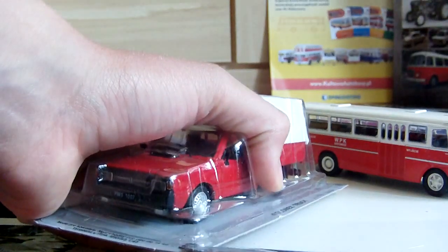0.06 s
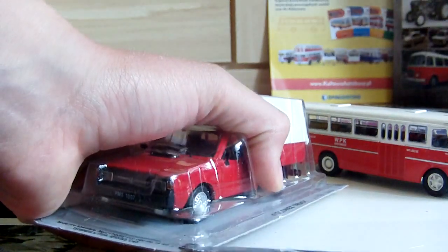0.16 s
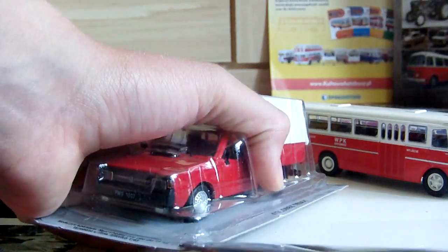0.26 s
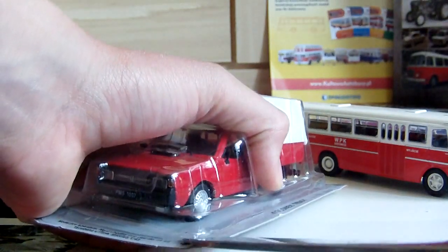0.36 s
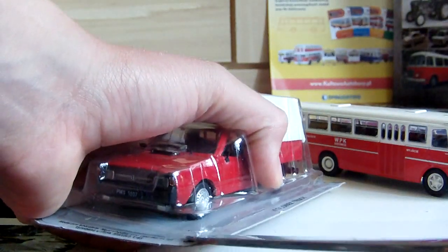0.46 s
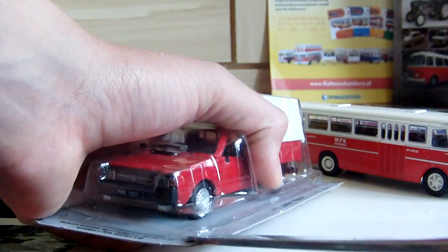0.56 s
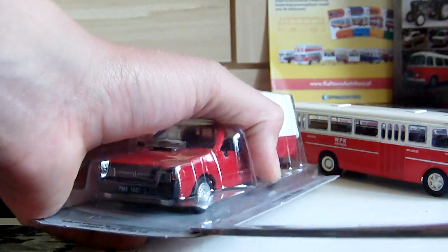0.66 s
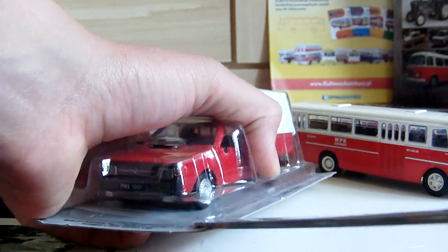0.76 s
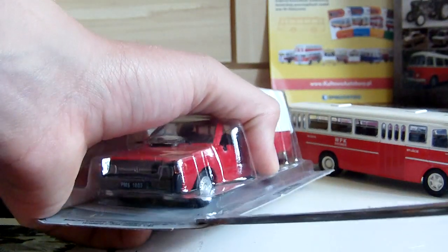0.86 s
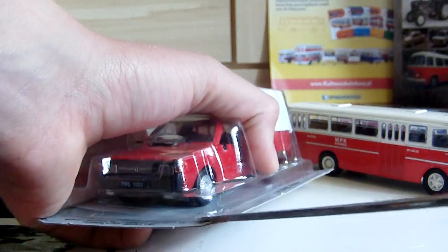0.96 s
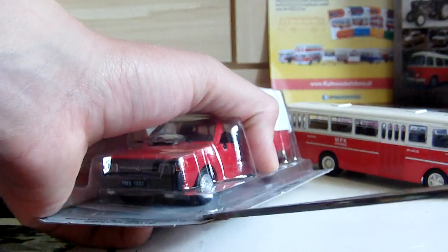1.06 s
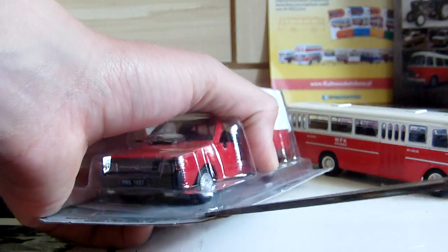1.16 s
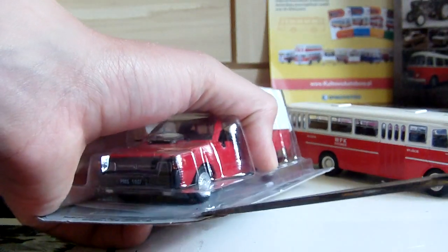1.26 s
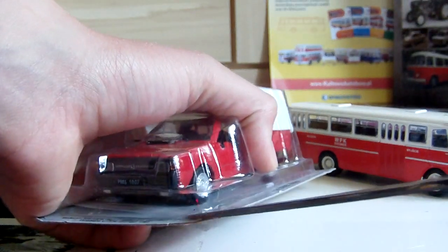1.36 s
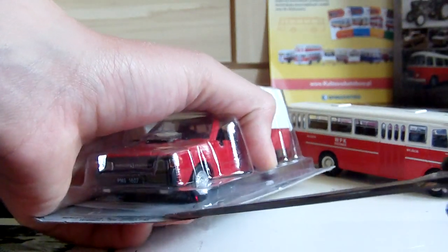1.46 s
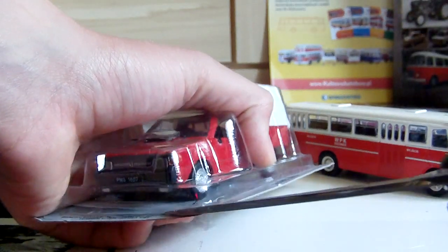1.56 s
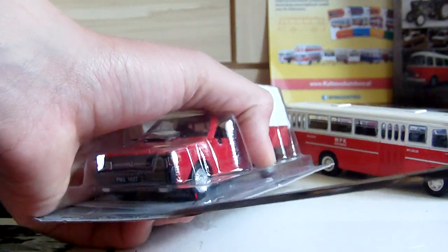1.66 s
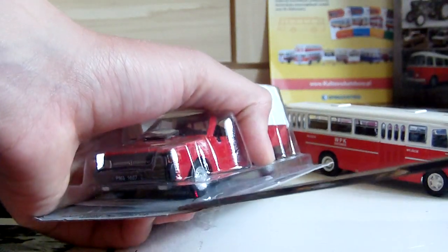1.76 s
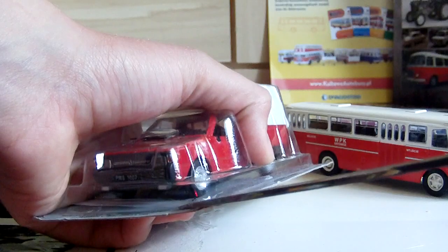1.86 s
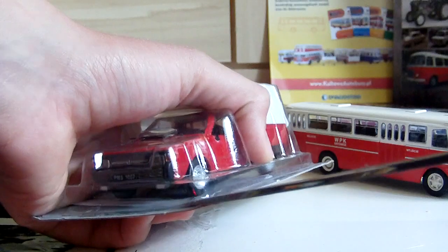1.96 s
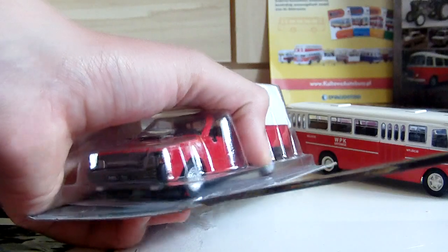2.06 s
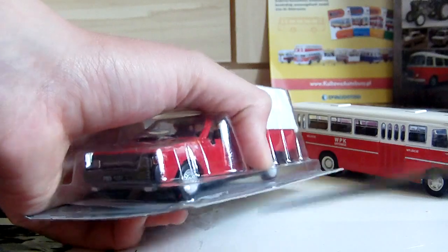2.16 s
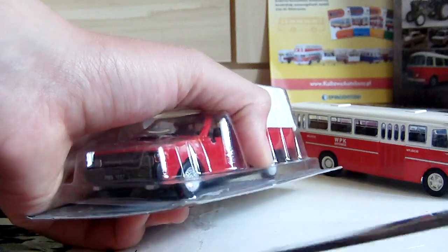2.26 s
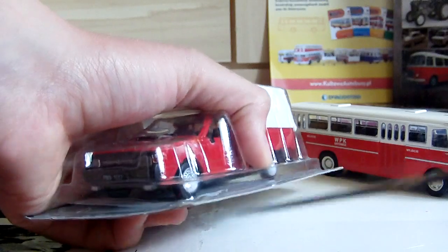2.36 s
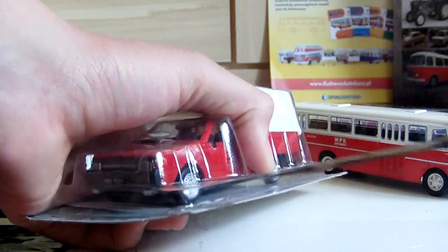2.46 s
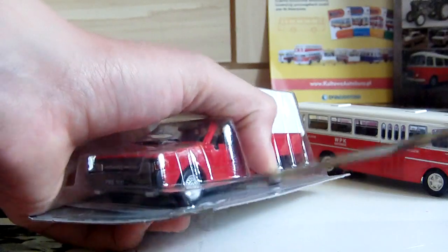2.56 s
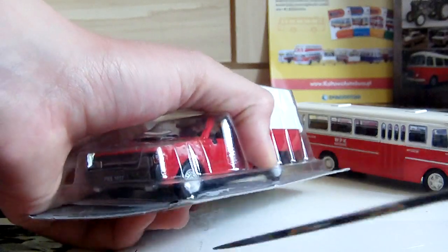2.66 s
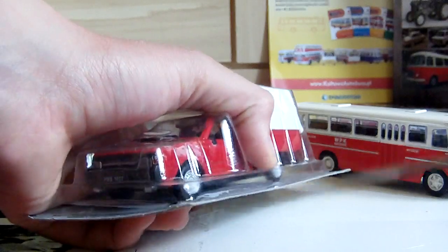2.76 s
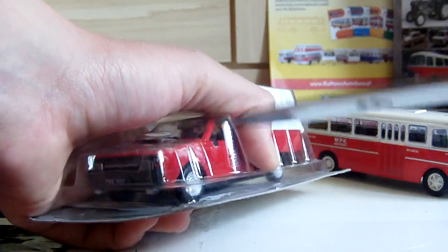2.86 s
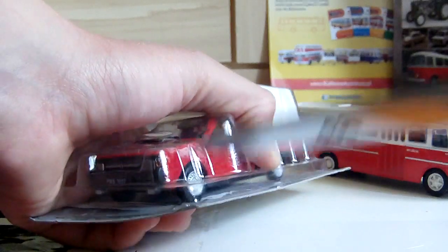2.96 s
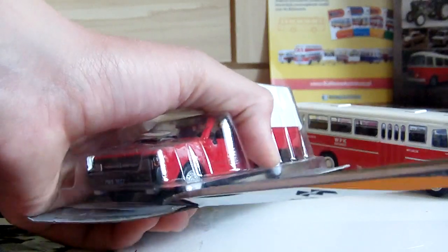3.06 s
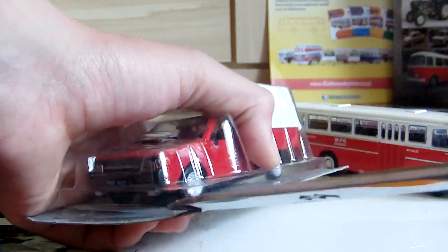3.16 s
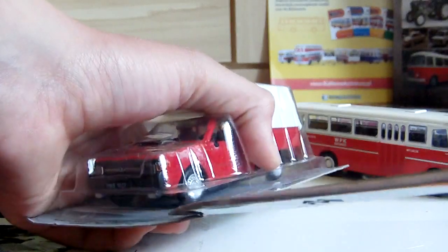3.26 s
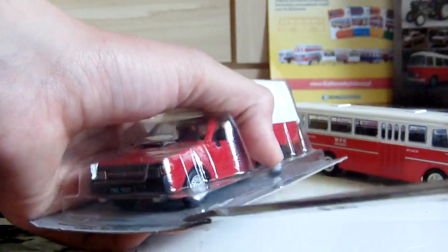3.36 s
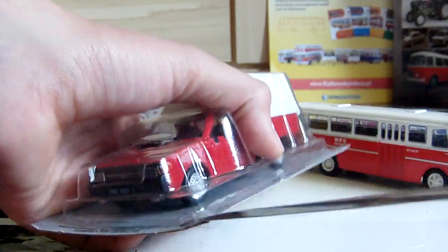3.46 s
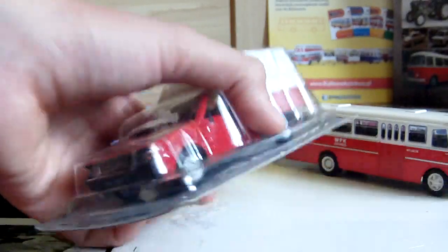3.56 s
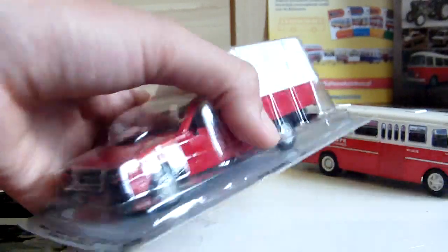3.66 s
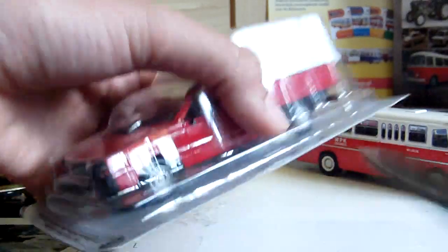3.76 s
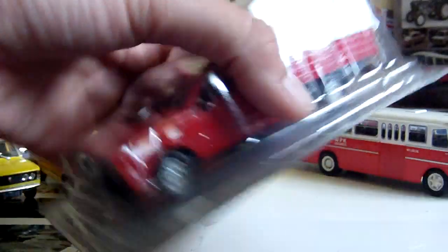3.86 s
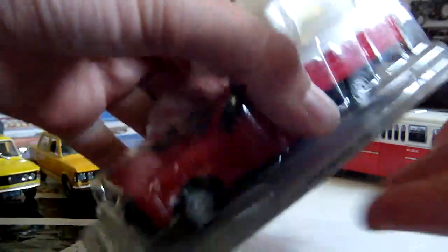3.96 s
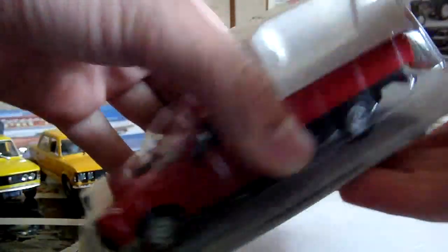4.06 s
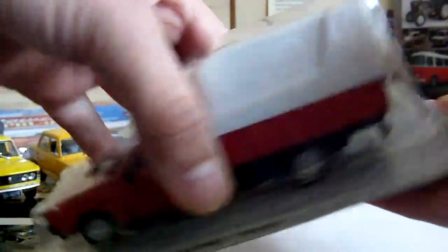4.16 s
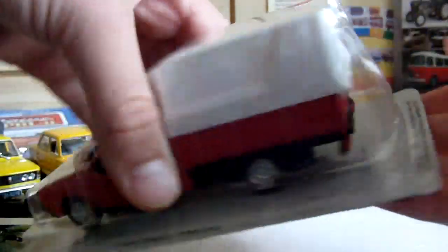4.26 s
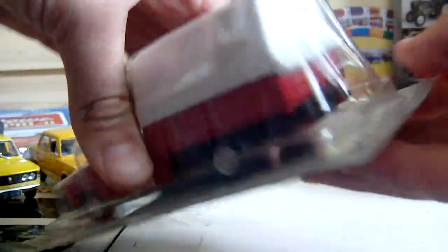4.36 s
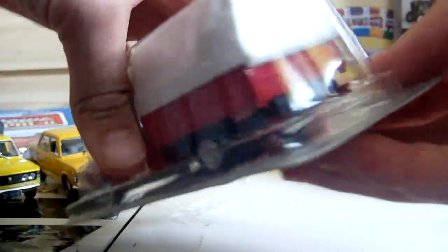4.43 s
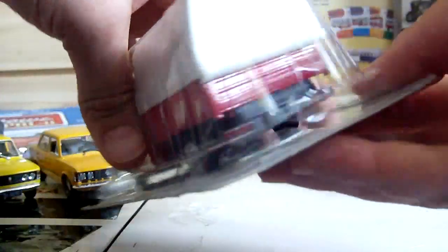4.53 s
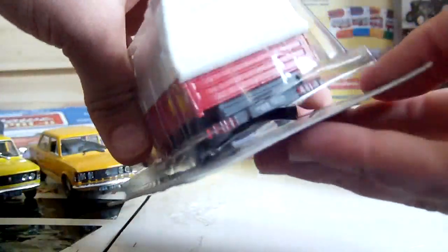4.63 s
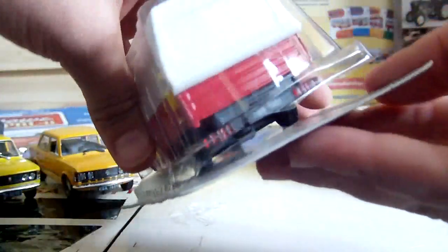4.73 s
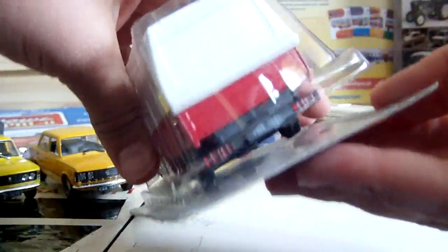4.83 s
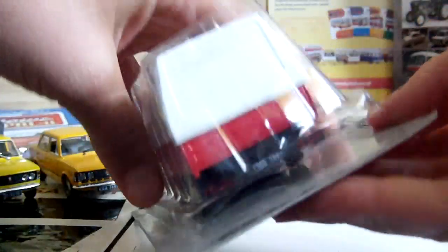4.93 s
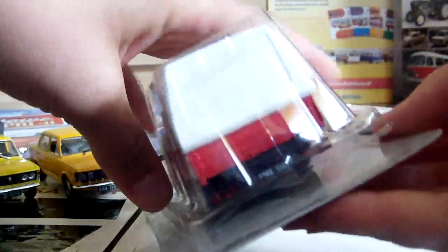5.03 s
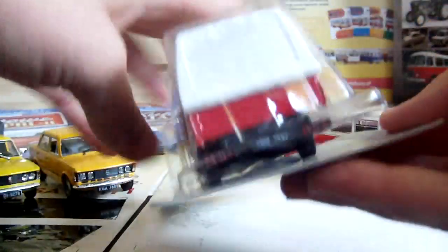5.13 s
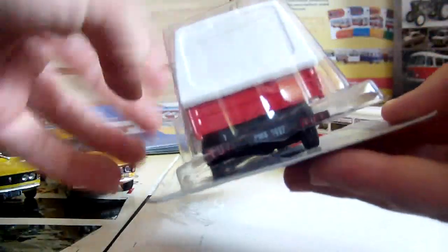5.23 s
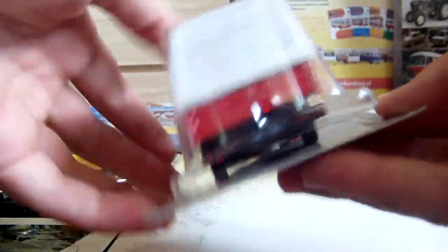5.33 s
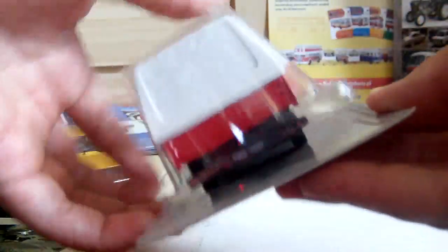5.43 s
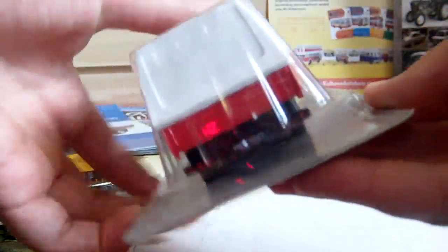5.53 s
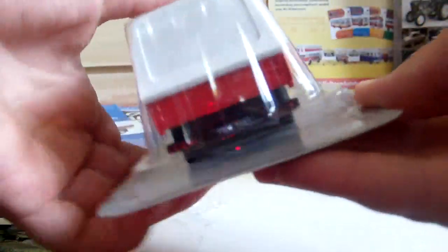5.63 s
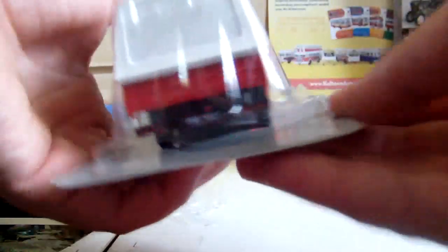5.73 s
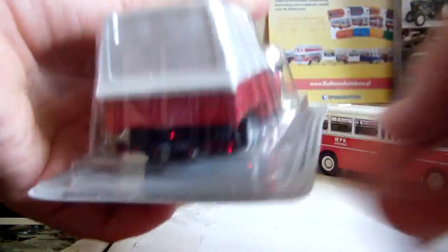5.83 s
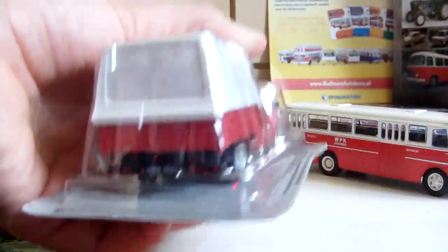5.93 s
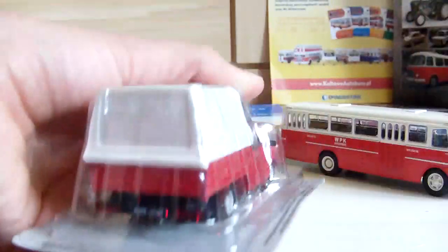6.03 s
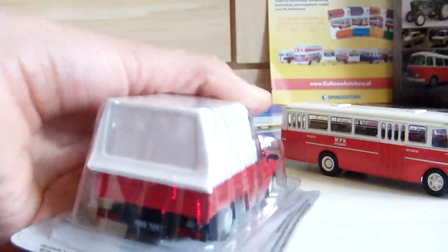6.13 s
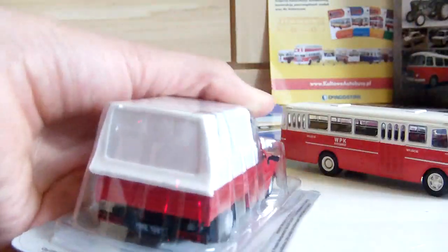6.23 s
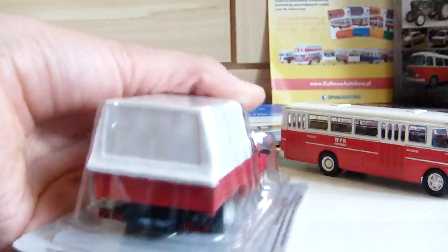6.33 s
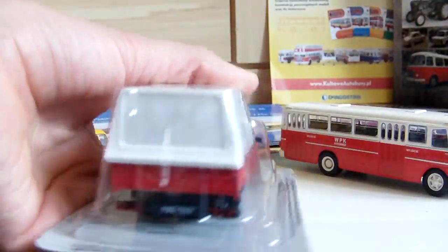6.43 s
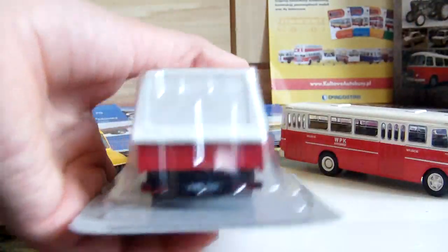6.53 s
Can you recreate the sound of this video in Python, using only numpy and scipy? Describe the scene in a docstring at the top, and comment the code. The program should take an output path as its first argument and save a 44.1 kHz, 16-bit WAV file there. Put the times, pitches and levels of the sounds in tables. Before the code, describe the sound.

Close, dry sound of fingers on a rigid clear plastic shell and its card backing. Nearly quiet at first, with isolated ticks and clicks; then the shell buckles in several loud cracks around the middle. Afterwards dull knocks, hollow scrapes, hissing rubs and irregular crinkles crowd together, with a dense rattling burst past five seconds. Faint deep rumble, hiss and very high electronic whine stay beneath.

```python
"""A model car in a stiff plastic blister pack is worked free by hand, close to a camera in a small room.
At first come a few light crackles, brushes of the fingers and, from 2 s, soft bumps on the table.
From 3 to 3.5 s the shell buckles in its hardest snaps; then crackles and finger strokes crowd together to the end.
Snaps are pushes through ringing modes, bumps are low sagging cycles, and fingers are filtered tiny slips.
Faint ticks, room noise, the table's low rumble and the thin whine of the camera's electronics run throughout."""
import sys
import numpy as np
from scipy import signal
from scipy.fft import rfft, irfft, next_fast_len
from scipy.io import wavfile
from scipy.ndimage import uniform_filter1d, map_coordinates

SR = 44100
rng = np.random.default_rng(int(sys.argv[2]) if len(sys.argv) > 2 else 0)


def master_out(mix):
    """Clip the mix to full scale and print it as 16-bit PCM to the path in sys.argv[1]."""
    frames = np.transpose(np.atleast_2d(mix))
    ceiling = np.clip(frames, -1, 1)
    pcm = np.round(ceiling * 32767).astype(np.int16)
    wavfile.write(sys.argv[1], SR, pcm)


N = 290619
TIME = np.arange(N) / SR


def amp(db):
    """Turn decibels into a gain."""
    return 10 ** (np.asarray(db) / 20)


def unit(x):
    """Scale to rms 1."""
    return x / np.sqrt(np.mean(x ** 2) + 1e-20)


def at_level(sound, db):
    """Scale a short sound to a level, as rms over 10 ms."""
    return amp(db) * np.sqrt(.01 * SR) * sound / np.linalg.norm(sound)


def fade(t, t60):
    """Die away exponentially, 60 dB down after t60 seconds."""
    return np.exp(-np.log(1000) * t / np.maximum(t60, 1e-3))


def along(points, hz):
    """Read (frequency, value) points on a log frequency axis."""
    f, v = np.transpose(points)
    return np.interp(np.log(hz + 1), np.log(f + 1), v)


def wobble(rate):
    """Draw a smooth random curve with rate knots a second."""
    return map_coordinates(rng.standard_normal(int(N * rate / SR) + 4), [TIME * rate])


def filtered(x, response):
    """Pass x through a filter given as a function of frequency."""
    size = next_fast_len(N + SR // 2)
    return irfft(rfft(x, size) * response(np.fft.rfftfreq(size, 1 / SR)), size)[:N]


def causal(gain):
    """Find the minimum-phase response with this gain: nothing sounds before the blow."""
    cepstrum = irfft(np.log(np.maximum(gain, 1e-6)))
    half = len(cepstrum) // 2
    cepstrum[1:half] *= 2
    cepstrum[half + 1:] = 0
    return np.exp(rfft(cepstrum))


def resonance(hz, centre, width):
    """One damped mode, gain 1 at its centre."""
    return 1j * hz * width / (centre ** 2 - hz ** 2 + 1j * hz * width)


def add(track, s, sound):
    """Mix a sound into the track at time s."""
    start = round(s * SR)
    track[start:start + len(sound)] += sound[:N - start]


# Buckles of the shell, levels before the scene's trim of the direct sound:
# (time [s], level as rms over 10 ms [dB], brightness [dB per octave], body [dB], dent pitch [Hz],
#  t60 of the flutter [s])
BUCKLES = [(0.3013, -32, -6.5, 2, 3500, .013), (0.613, -59, -11, -14, 2200, .03),
           (1.3572, -42.5, -5, 1, 2840, 0.013), (2.0518, -41, -9, 7, 590, 0.03),
           (2.066, -48.5, -6.5, -6, 1580, .04), (2.0784, -43.5, -10, -12, 2960, 0.017),
           (2.1052, -44.5, -7.5, -8, 2250, .065), (2.1213, -38, -9, -4.5, 2300, 0.015),
           (2.399, -58.5, -8, -9, 2200, 0.021), (2.4758, -52.5, -5.5, -6, 1720, 0.015),
           (2.9969, -36.5, -6, -1, 2880, 0.05), (3.0024, -23, -1, 1, 3700, 0.011),
           (3.277, -18.5, -1, 6, 4000, 0.013), (3.292, -32, -3, 5, 3800, 0.019),
           (3.3512, -12.5, -4, -6.5, 3650, 0.013), (3.4433, -11.5, -2.5, -7, 1510, 0.013),
           (3.476, -37.5, -12.5, -7.5, 590, 0.098), (3.5274, -44.5, -7.5, -20, 1900, .044),
           (3.6824, -32.5, -0.5, 19.5, 7450, 0.019), (3.7613, -47.5, -1, 16.5, 780, 0.062),
           (3.8022, -38, -19, 10, 670, 0.048), (3.8166, -40.5, -1, 15, 5040, 0.025),
           (3.83, -34.5, -3.5, 15.5, 1600, 0.067), (4.2515, -44.5, -1, 19, 1500, .09),
           (4.3774, -35, 0.5, 12, 740, 0.013), (4.397, -40, -6, 7.5, 1690, 0.023),
           (4.433, -47.5, -6, 10, 1540, .03), (4.447, -46.5, -7, 8, 1700, 0.026),
           (4.4618, -51, -7, -3, 1450, 0.04), (4.4904, -41, -7, -1, 1580, .073),
           (4.517, -38.5, -9, 2, 1560, 0.31), (4.5378, -30, -1.5, 8.5, 1550, 0.013),
           (4.7385, -31.5, -10, -8, 3420, 0.034), (4.8979, -41, -8.5, -1.5, 1330, .039),
           (4.9136, -40.5, -1, 25, 5800, 0.049), (4.9406, -40.5, -0.5, 10, 1750, 0.02),
           (5.049, -42.5, -2, 19, 880, 0.038), (5.2623, -31, -3, 13, 1530, .045),
           (5.2761, -23.5, -5, 5.5, 1760, .026), (5.2801, -24.5, -1.5, 6.5, 1740, 0.035),
           (5.2835, -26.5, -2, 9, 2400, .022), (5.2873, -21, -2.5, 16, 3380, 0.035),
           (5.294, -33, -8.5, 0, 3370, 0.086), (5.2997, -40.5, -3, 5, 3340, 0.049),
           (5.312, -34, -4, 4, 3150, 0.038), (5.3235, -41.5, -1.5, 13, 5700, 0.015),
           (5.381, -37.5, -6.5, -13, 1600, 0.31), (5.4355, -40.5, -3.5, 13, 1650, 0.029),
           (5.4427, -37, -9.5, -5.5, 2370, 0.033), (5.4707, -36, -3.5, 6.5, 1600, 0.1),
           (6.0521, -33.5, -6, -7, 2750, .025), (6.0764, -25.5, -4, -9.5, 2900, 0.032),
           (6.081, -45.5, -7.5, -7, 2880, 0.034), (6.1088, -36.5, -7.5, -31, 4340, 0.018),
           (6.12, -42.5, -7, -8, 2780, 0.024), (6.1876, -52.5, -7.5, -17, 2880, .03),
           (6.479, -33, -7.5, 11.5, 3030, 0.031), (6.4869, -35.5, -5, 8, 2300, 0.069)]
# How the wall radiates a buckle: (frequency [Hz], gain [dB])
WALL_RADIATION = [(250, 1.5), (500, -2), (950, -7.5), (1400, -5), (2000, -4.5), (4000, 1.5), (5500, 2),
                  (8500, -2.5), (11200, 1.5), (14500, -8.5)]
BODY_HZ = 1080  # below this the pack sounds as a whole, if the buckle shakes it
DENT_GAIN, DENT_Q = 1.42, 7.4  # ring of the dented panel: gain for an average snap, sharpness
DENT_GROWS = 0.16  # extra dB of ring per dB of a snap above the average


def snaps(flutter=0.78, crack=0.41, size=4096):
    """Each buckle is a sharp push and a flutter of the wall; returns the sound to the camera and into the room."""
    near, around = np.zeros(N), np.zeros(N)
    t, hz = np.arange(size) / SR, np.fft.rfftfreq(size, 1 / SR)
    bare_crack = resonance(hz, 3800, 5000)  # before any mode rings
    octaves = np.log2(np.clip(hz, 500, 12000) / 2000)
    bass = 1 / (1 + (hz / BODY_HZ) ** 6)
    radiation = amp(along(WALL_RADIATION, hz))
    average_db = np.mean(BUCKLES, axis=0)[1]
    for s, db, brightness, body_db, dent_hz, t60 in BUCKLES:
        wall = rng.standard_normal(size) * fade(t, t60)
        # slow buckles are mostly flutter
        push = flutter * (t60 / 0.0086) * wall / np.linalg.norm(wall)
        push[0] += 1
        # a crisp buckle is bright, one cushioned by a finger dull
        touch = amp(brightness * octaves + body_db * bass)
        modes = np.hypot(shell(hz, bend=.015, scatter_db=1.5), crack * np.abs(bare_crack))
        # the dented panel rings at its own pitch
        ring = DENT_GAIN * amp(DENT_GROWS * (db - average_db))
        panel = 1 + ring * resonance(hz, dent_hz, dent_hz / DENT_Q)
        direct = irfft(rfft(push) * causal(modes * touch * radiation) * panel)
        add(near, s, at_level(direct, db))
        # over all directions the modes average out
        spread = irfft(causal(touch * np.sqrt(np.abs(panel))) * bare_crack)
        add(around, s, at_level(spread, db))
    return near, around


# Resonances of the shell before random shifts: (centre [Hz], width [Hz], level [dB])
SHELL_MODES = [(660, 120, -13), (1340, 116, -0.5), (1578, 650, -1.5), (2080, 420, 0.5), (2850, 550, -6),
               (3460, 990, -4.5), (4340, 550, -6.5), (5215, 380, -19), (5880, 520, -2), (6760, 510, 1),
               (9080, 350, -2), (10080, 670, -12), (12200, 310, -10), (13200, 2500, -17.5)]


def shell(hz, bend, scatter_db):
    """Gain of the shell; bending shifts its modes and the spot struck sets their strengths."""
    power = 0
    draws = rng.standard_normal((len(SHELL_MODES), 2))
    for (centre, width, db), (shift, spot) in zip(SHELL_MODES, draws):
        mode = amp(db + scatter_db * spot) * resonance(hz, centre * (1 + bend * shift), width)
        power = power + np.abs(mode) ** 2
    return np.sqrt(power)


# Dull bumps of the pack: (time [s], level of the tone before its fades [dB], settled pitch [Hz], t60 [s])
BUMP_LIST = [(2.054, -39.5, 236.5, 0.076), (2.475, -45, 244, 0.092), (3.446, -48, 124.6, 1),
             (3.669, -26, 112, .1), (3.8058, -21, 108, 0.062), (3.908, -32.5, 113, 0.12),
             (5.277, -16.5, 184, 0.023), (5.32, -37.5, 134, 0.093)]


def bumps(attack=0.0013, rough=0.44, sag=1.0):
    """The pack and the hand land softly: a few low cycles whose pitch sags as the contact relaxes."""
    track, t = np.zeros(N), np.arange(SR // 2) / SR
    for s, db, hz, t60 in BUMP_LIST:
        noise = rng.standard_normal(len(t))
        thud = unit(uniform_filter1d(uniform_filter1d(noise, size=70), size=50))
        sagging_hz = hz * (1 + sag * fade(t, 0.013))
        phase = 2 * np.pi * np.cumsum(sagging_hz) / SR
        envelope = fade(t, t60) * (1 - np.exp(-t / attack))
        add(track, s, amp(db) * (rough * thud - np.sin(phase)) * envelope)
    return track


# Strokes of the fingers, levels before the trims and wobble below:
# (start [s], length [s], level on the card [dB], level on the plastic [dB], swell from start to end [dB])
FINGER_STROKES = [(0.239, 0.057, -60.5, -56, -13), (1.307, .11, -64.5, -58, 6),
                  (1.57, 0.093, -80, -68.5, 3), (1.863, 0.22, -63, -60, 9.5), (3.652, 0.065, -58, -53, -10),
                  (3.787, 0.061, -55, -51.5, 6.5), (3.892, 0.034, -55, -51, 10.5),
                  (3.981, 0.022, -48, -38, -15.5), (4.013, 0.089, -68, -52.5, 1),
                  (4.099, 0.12, -52.5, -49.5, -4), (4.237, 0.13, -44, -48, -4.5),
                  (4.433, 0.059, -55, -60.5, 6), (4.499, 0.044, -43, -43, -3.5),
                  (4.576, 0.17, -65.5, -63.5, 10), (4.839, 0.068, -53, -58.5, -10),
                  (4.892, 0.091, -56, -51.5, 2.5), (5.018, 0.052, -54, -50, -1),
                  (5.101, 0.043, -63.5, -60.5, -10), (5.307, .09, -59, -58, -4),
                  (5.406, .085, -54.5, -55, 16), (5.513, 0.18, -56.5, -49, -13.5),
                  (5.639, 0.054, -64, -43.5, 2), (5.733, 0.048, -69.5, -60, 17),
                  (5.937, 0.012, -50.5, -46, -0.5), (5.963, 0.074, -65.5, -50.5, 2),
                  (6.035, 0.051, -53.5, -45, 3), (6.13, 0.055, -64, -62, -3), (6.284, 0.091, -65.5, -57, 0),
                  (6.391, 0.066, -63, -53.5, -5), (6.502, 0.083, -62.5, -53.5, 8)]
# Tone of skin on card before the shell colours it, relative: (frequency [Hz], level [dB per Hz])
CARD_TONE = [(250, -10), (450, -4.5), (620, 9), (950, -1), (1550, 0), (2200, -13.5), (3000, -75),
             (6000, -58)]
# Tone of skin on plastic before the shell colours it, relative: (frequency [Hz], level [dB per Hz])
PLASTIC_TONE = [(900, -38), (1600, -5.5), (2300, -1.5), (2900, -2.5), (4200, -1.5), (6600, -4.5),
                (9300, -12), (12000, -16.5), (15000, -29)]


def fingers(card_db=-.5, plastic_db=-1.0):
    """Skin drags over the backing card (hollow, grainy) and the dome (hissing), with an unsteady grip."""
    card_power, plastic_power = np.zeros(N), np.zeros(N)
    for s, length, on_card_db, on_plastic_db, swell_db in FINGER_STROKES:
        pressure = stroke(length, swell_db)
        add(card_power, s, (amp(on_card_db) * pressure) ** 2)
        add(plastic_power, s, (amp(on_plastic_db) * pressure) ** 2)
    scrape = friction(CARD_TONE, slips_per_s=350, smooth=.55, ring=.55, patchy_db=3)
    hiss = friction(PLASTIC_TONE, slips_per_s=650, smooth=1.1, ring=.4, patchy_db=2.8)
    card = np.sqrt(card_power) * amp(card_db + 2.4 * wobble(110)) * scrape
    plastic = np.sqrt(plastic_power) * amp(plastic_db + wobble(80)) * hiss
    return card + plastic


GRIP_S, LET_GO_T60_S = 0.019, 0.24  # time to take hold, and to die away once the finger stops


def stroke(length, swell_db):
    """A finger takes hold, slides with growing or easing pressure, and lets go."""
    t = np.arange(SR) / SR
    grip = np.minimum(t / GRIP_S, 1)
    slide = amp(swell_db * (np.minimum(t / length, 1) - .5))
    return grip * slide * fade(np.maximum(t - length, 0), LET_GO_T60_S)


def friction(spectrum, slips_per_s, smooth, ring, patchy_db):
    """Tiny slips of uneven size on a smooth hiss; moving fingers damp and free the shell's resonances."""
    def colour(hz):
        return amp(along(spectrum, hz)) * (shell(hz, bend=.02, scatter_db=1) + .08) ** ring

    slips = (rng.random(N) < slips_per_s / SR) * rng.standard_normal(N)
    rubbing = filtered(unit(slips) + smooth * rng.standard_normal(N), colour)
    z = signal.stft(rubbing, nperseg=512)[2]
    # patches of frequency and time grow louder and softer at random
    field = uniform_filter1d(rng.standard_normal(z.shape), size=4, axis=0)
    field = uniform_filter1d(field, size=20, axis=1)
    return unit(signal.istft(z * amp(patchy_db * unit(field)), nperseg=512)[1][:N])


def ticks():
    """The strained plastic gives a faint tick now and then while it is held, about 5 a second at random."""
    pops = (rng.random(N) < 5 / SR) * amp(-31 + 3 * rng.standard_normal(N))
    hz = np.fft.rfftfreq(4096, 1 / SR)
    tick = irfft(causal(shell(hz, bend=.03, scatter_db=2) / np.hypot(1, hz / 4000)))
    return signal.fftconvolve(pops, tick)[:N]


# How long the room rings: (frequency [Hz], t60 [s])
ROOM_DECAY = [(200, 0.93), (1500, 0.059), (4000, 0.29), (8000, 0.32), (15000, 0.12)]


def room(x, wet_db=-23.0, delay=0.0087):
    """The walls of a small furnished room answer faintly after a short gap: noise that fades by frequency."""
    hz, t, z = signal.stft(rng.standard_normal(SR // 2), SR, nperseg=256)
    tail = signal.istft(z * fade(t, along(ROOM_DECAY, hz)[:, None]), SR, nperseg=256)[1]
    tail = np.pad(tail / np.linalg.norm(tail), (int(delay * SR), 0))
    return amp(wet_db) * signal.fftconvolve(x, tail)[:N]


# Tone of the room noise, relative: (frequency [Hz], level [dB])
AIR_TONE = [(12, -53), (20, 2.5), (38, -9), (199, -16.5), (674, -26.5), (733, -27), (2040, -34.5),
            (2480, -35), (8380, -44), (15000, -44)]
AIR_DB = -53  # rms level of the room noise


def room_noise():
    """Room noise and hiss: steady random noise, strongest in the deep bass."""
    noise = filtered(rng.standard_normal(N), lambda hz: amp(along(AIR_TONE, hz)))
    return amp(AIR_DB) * unit(noise)


# The table's low resonance, present from the start, dipping near 3.5 and 4.35 s and strongest near 6 s:
# (time [s], level [dB])
RUMBLE_LEVEL = [(0, -58), (3.5, -68.5), (3.75, -53), (4.1, -51.5), (4.35, -73), (4.75, -53.5), (5.8, -55),
                (6.05, -50), (6.59, -51)]


def table_rumble(rumble_hz=62.1):
    """The table rumbles under the arms: noise through one low resonance, with a changing level."""
    def table(hz):
        return resonance(hz, rumble_hz, 6) / (1 + (hz / 150) ** 2)

    level_db = np.interp(TIME, *np.transpose(RUMBLE_LEVEL))
    return amp(level_db) * unit(filtered(rng.standard_normal(N), table))


# Tones of the whine: (field-rate steps below the line rate [count], rms level [dB])
WHINE_TONES = [(0, -70), (1, -74), (2, -75), (3, -82), (4, -80), (6, -85)]
LINE_HZ, FIELD_HZ = 15734.3, 59.94  # scan rates of the camera's electronics


def electronic_whine():
    """The camera's scanning circuit gives a comb of high tones, each wavering slightly in phase."""
    whine = np.zeros(N)
    for step, db in WHINE_TONES:
        phase = 2 * np.pi * ((LINE_HZ - step * FIELD_HZ) * TIME + rng.random())
        whine += np.sqrt(2) * amp(db) * np.sin(phase + .3 * wobble(10))
    return whine


def scene(snap_db=-1.04):
    """The pack and its echo in the room, over the background; snap_db trims the direct snaps."""
    near, around = snaps()
    handling = bumps() + fingers() + ticks()
    background = room_noise() + table_rumble() + electronic_whine()
    return (amp(snap_db) * near + handling + room(around + handling) + background)[None]


TOP_HZ = 15950  # band limit


def record(dry, notch_hz=7890.0):
    """The microphone port weakens a band of treble; peaks past full scale clip; a steep filter limits the band."""
    def port(hz):
        return 1 - .66 * resonance(hz, notch_hz, 1200)

    clipped = np.clip(filtered(dry[0], port), -1, 1)
    return filtered(clipped, lambda hz: 1 / (1 + (hz / TOP_HZ) ** 300))[None]


dry = scene()
out = record(dry)
master_out(out)
```